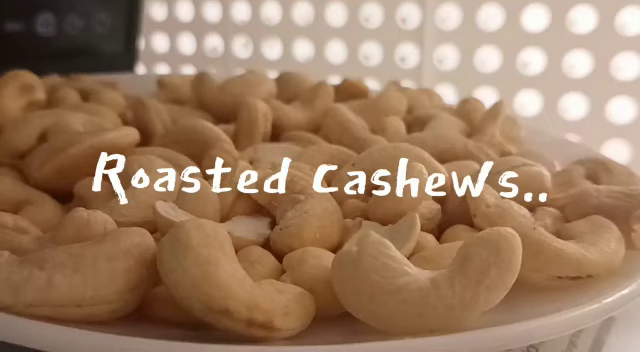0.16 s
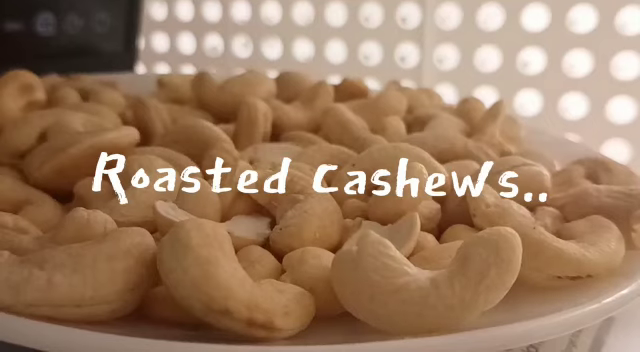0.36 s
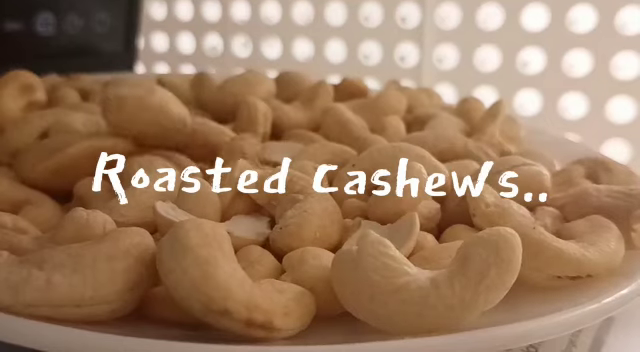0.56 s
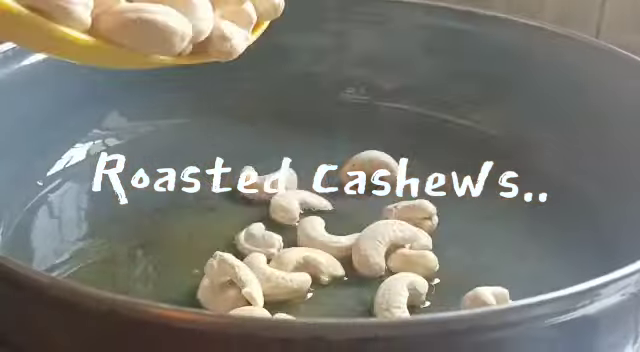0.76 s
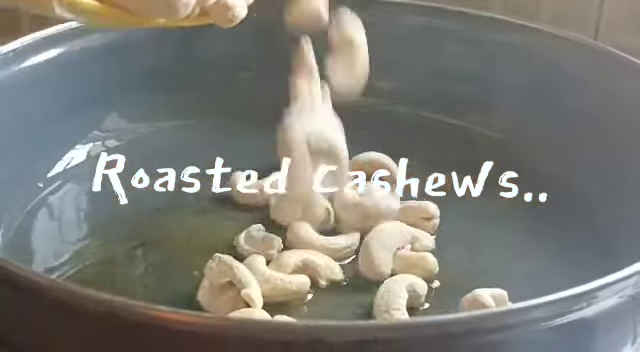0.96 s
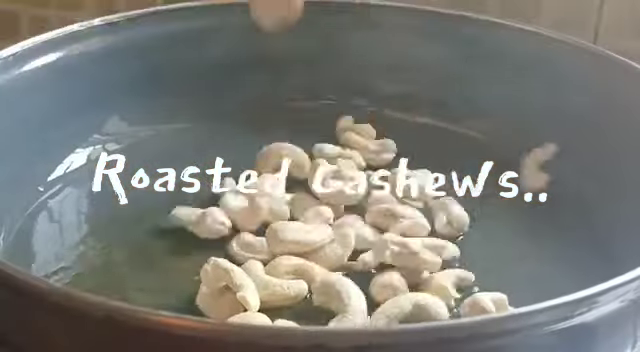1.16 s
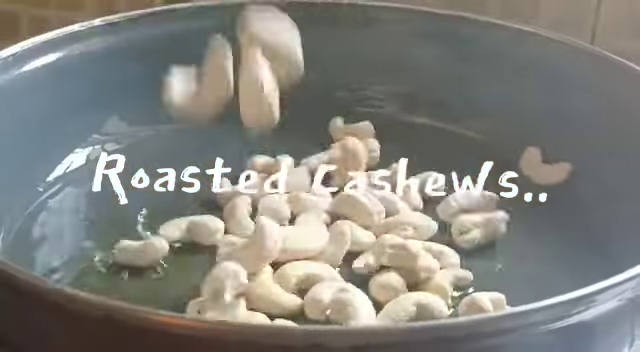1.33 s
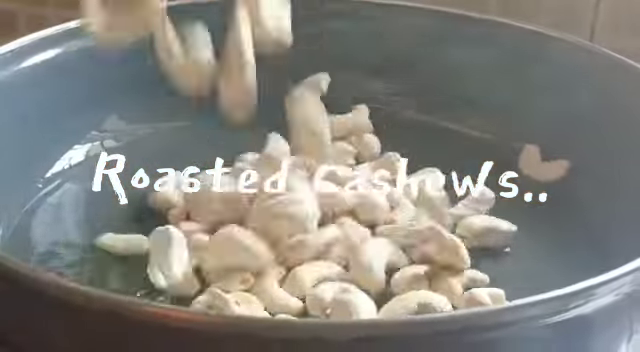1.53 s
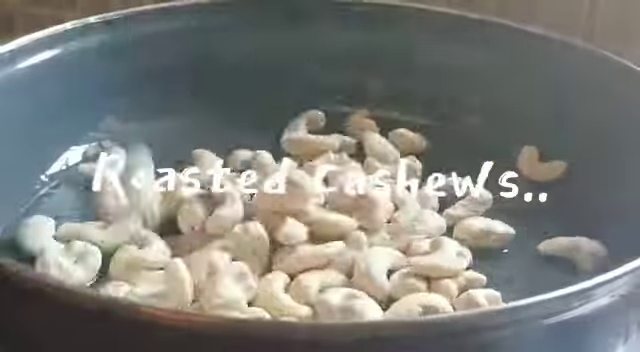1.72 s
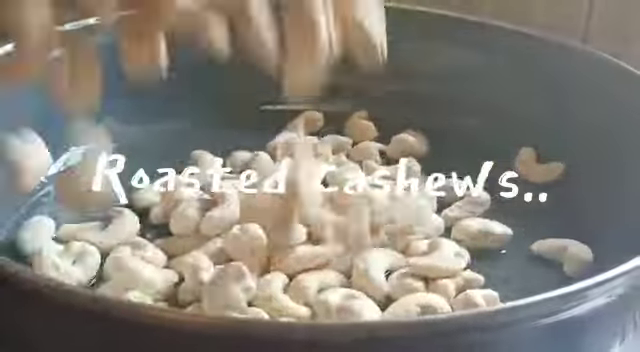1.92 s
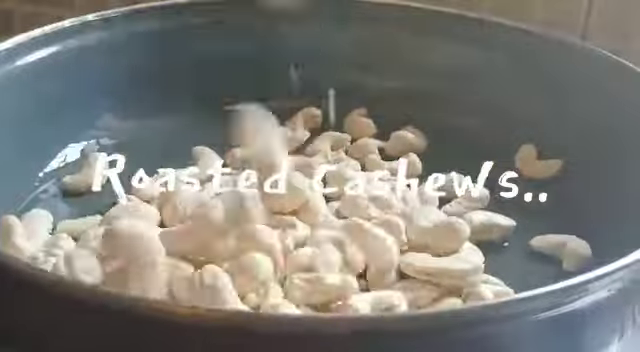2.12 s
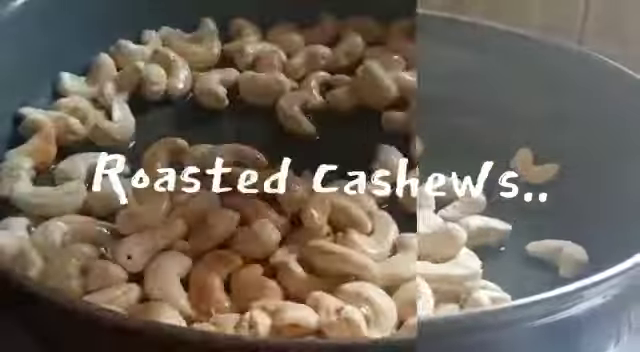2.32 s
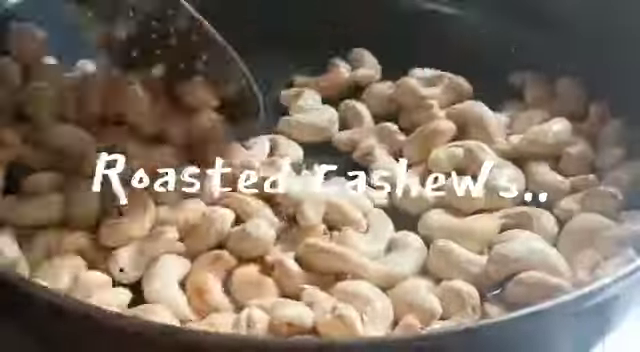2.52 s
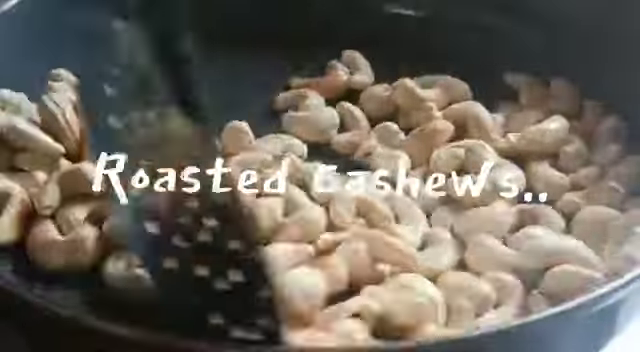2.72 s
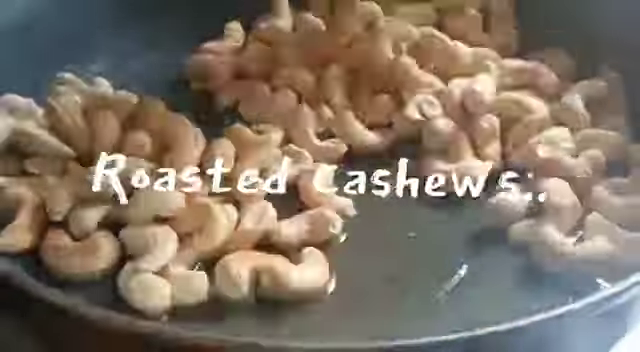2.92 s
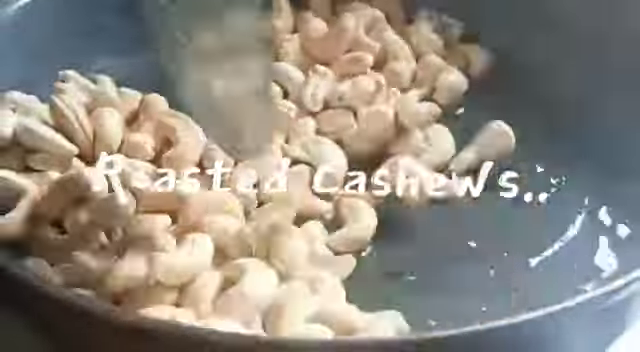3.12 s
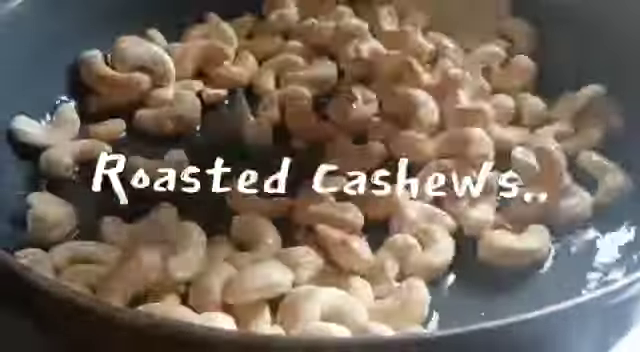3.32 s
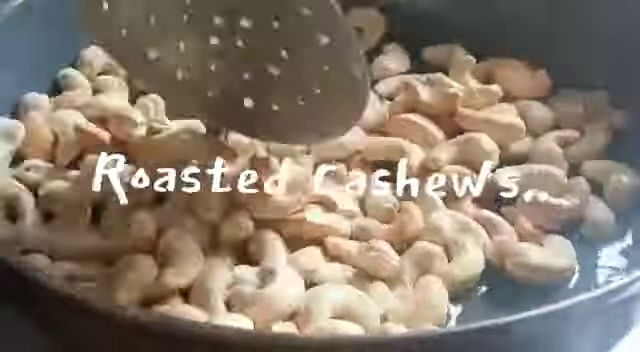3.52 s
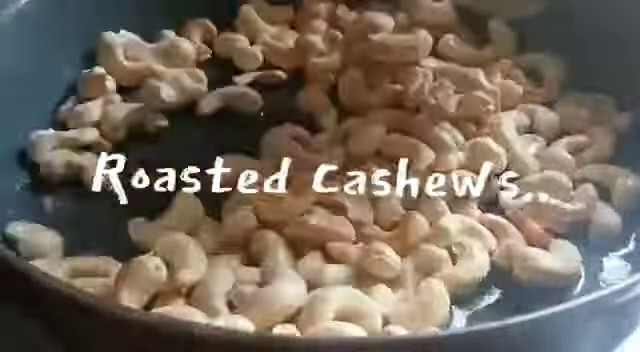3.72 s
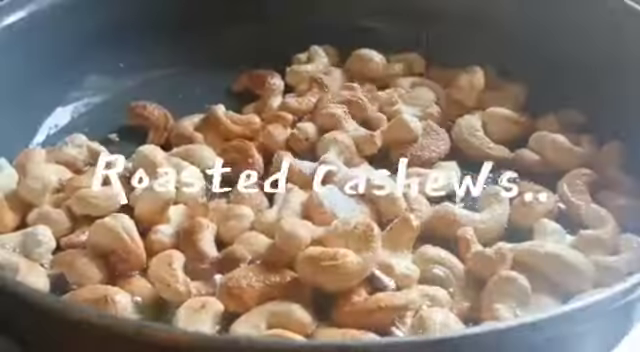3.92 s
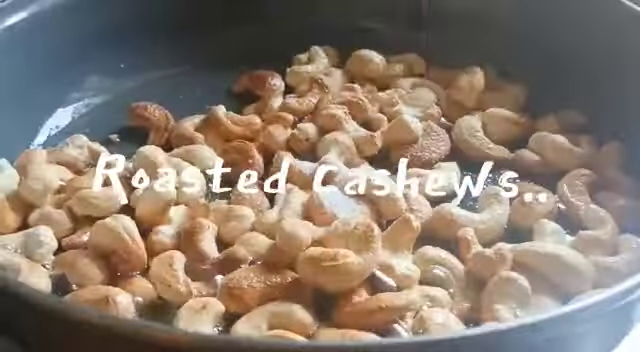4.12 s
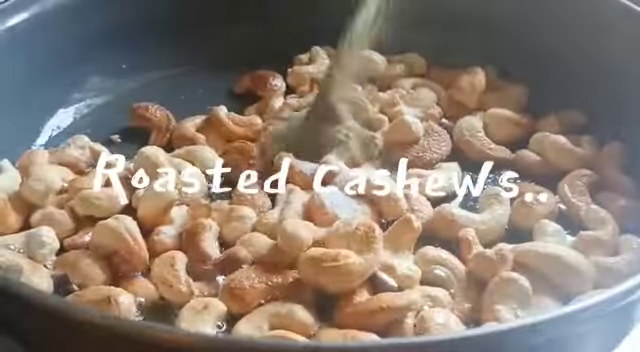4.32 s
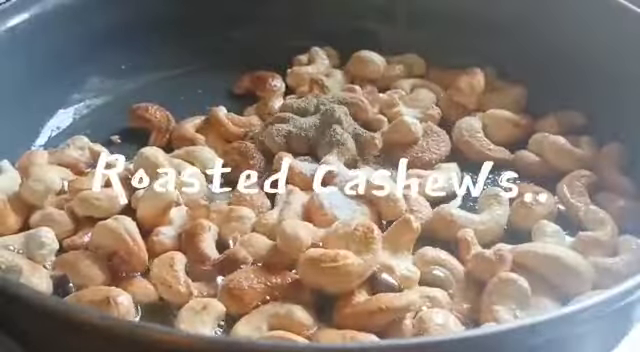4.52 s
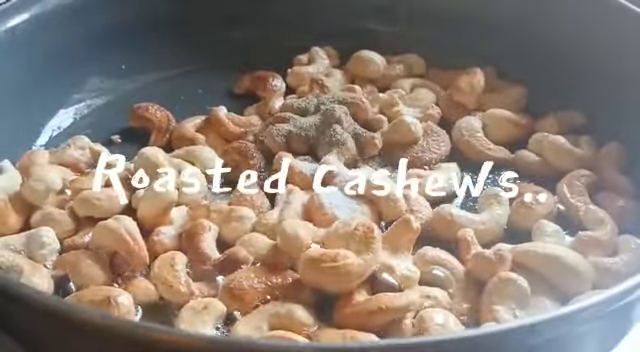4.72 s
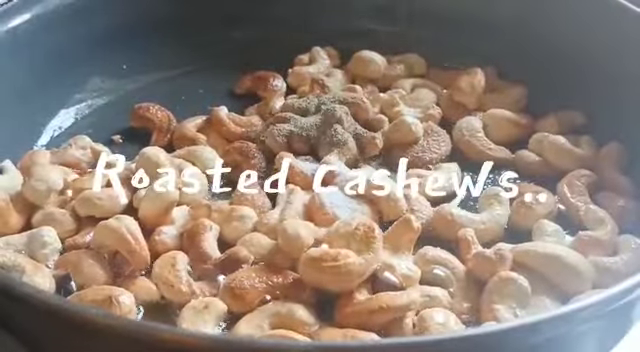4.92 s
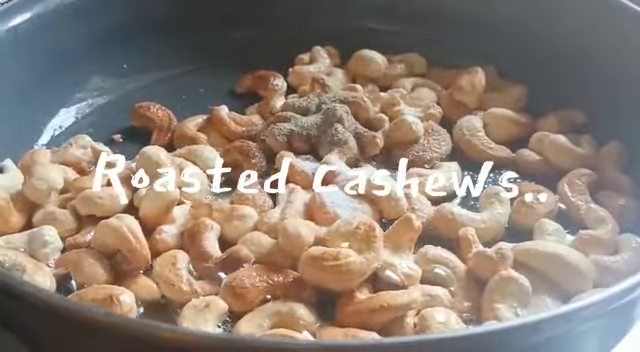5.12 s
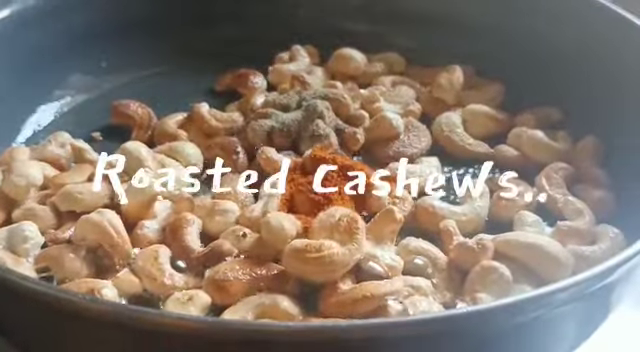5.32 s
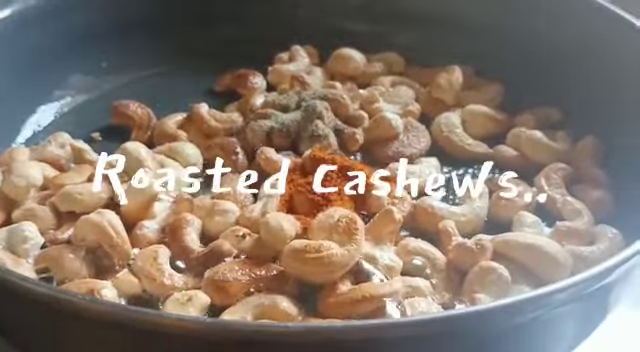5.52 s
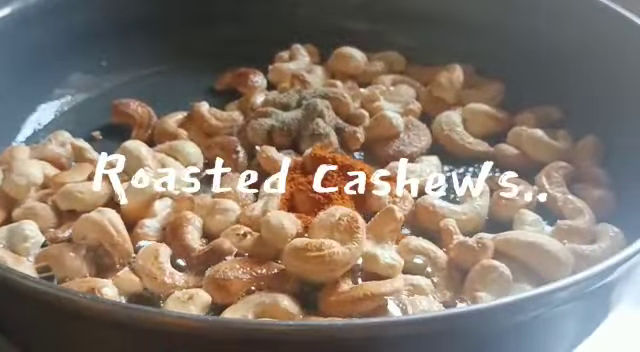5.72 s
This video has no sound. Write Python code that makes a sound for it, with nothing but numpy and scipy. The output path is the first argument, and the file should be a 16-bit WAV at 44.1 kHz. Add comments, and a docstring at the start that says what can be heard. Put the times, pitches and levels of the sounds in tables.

```python
"""Cashews poured into an oiled frying pan, ringing the bare metal and then thudding on the heap;
a spatula knocks and scrapes among them. This is the middle of three short scenes in a kitchen, with
silence between: before it a nut bounces on a china plate, after it a spoon taps over sizzling oil and
the stove's hum. Blows are noise cracks with ringing modes, rubbing is a crowd of small blows, oil is
random pops over hiss, and the room is filtered noise, all shared between a left and a right microphone."""
import sys
import numpy as np
from scipy import signal
from scipy.fft import rfft, irfft, next_fast_len
from scipy.io import wavfile
from scipy.ndimage import uniform_filter1d

SR = 44100
rng = np.random.default_rng(int(sys.argv[2]) if len(sys.argv) > 2 else 0)


def write(x):
    x = np.atleast_2d(x).T
    wavfile.write(sys.argv[1], SR, np.round(np.clip(x, -1, 1) * 32767).astype(np.int16))


N = 258426
TIME = np.arange(N) / SR
RING_TIME = np.arange(10000) / SR

# resonances of the frying pan: (frequency [Hz], relative level [dB], decay by 60 dB [s])
PAN_MODES = [(648.2, 1, 0.17), (793, -1.5, .26), (870, -5, 0.5), (966.4, 2, 0.11), (1040, 5, 0.18),
             (1245, -0.5, 0.33), (1356, -1, 0.2), (1595, 8, 0.08), (1440, -24.5, 0.12), (1972, -3, 0.23),
             (2090, -6.5, 0.14), (2426, -9.5, 0.23), (2934, -2.5, 0.26), (3690, -18, 0.98),
             (3930, -12, 0.99), (4140, -6, 0.031)]


def pour():
    """Nuts fall on the bare pan, which rings; once it is covered they land with a duller thud."""
    # single nuts landing: (time [s], relative clack level [dB], hardness as clack over body [dB])
    drops = [(0.914, -36.5, 5), (0.984, -28, -8), (1.018, -18.5, 5.5), (1.051, -30, -11.5),
             (1.08, -29.5, -5), (1.113, -36.5, 12), (1.131, -30, -10.5), (1.162, -29.5, -6.5),
             (1.229, -28.5, 5), (1.271, -31.5, 11.5), (1.293, -23.5, 7.5), (1.312, -29, -11),
             (1.341, -35.5, -9.5), (1.376, -38.5, -11), (1.423, -25.5, -4.5), (1.47, -29.5, -5.5),
             (1.509, -24, 2.5), (1.555, -29, -3.5), (1.571, -23.5, -3.5), (1.652, -22.5, 10),
             (1.675, -28.5, -2.5), (1.734, -24, 8), (1.78, -38, -7.5), (1.814, -40.5, -15.5),
             (1.842, -36, -4), (1.959, -26.5, -0.5), (2.007, -23, 0), (2.04, -23, -4.5), (2.071, -18, 8),
             (2.082, -26, 10), (2.109, -24.5, 8), (2.123, -27, -4.5), (2.162, -34.5, 3), (2.203, -39, -5.5),
             (2.26, -37, -6), (2.334, -38, 5.5)]
    # handfuls tumbling in: (start [s], length [s], relative level [dB])
    handfuls = [(0.914, 0.083, -48), (0.987, 0.0074, -31.5), (1.022, 0.2, -23.5), (1.321, 0.02, -26),
                (1.428, 0.1, -25.5), (1.564, 0.16, -22.5), (1.961, 0.11, -27.5)]
    # nuts sliding just before they fall: (start [s], length [s], relative level [dB])
    slides = [(0.876, 0.09, -62.5), (1.899, 0.05, -43)]
    # crack of a nut on bare pan: (frequency [Hz], relative level [dB])
    nut_on_pan = [(59, -70.5), (100, -58.5), (197, -23.5), (471, -16), (768, -1.5), (1010, -8),
                  (1130, -15.5), (1280, 1.5), (1450, -9.5), (2040, -12.5), (2800, -13), (7140, -26),
                  (9210, -31), (12400, -47), (16000, -40.5)]
    # crack of a nut on other nuts: (frequency [Hz], relative level [dB])
    nut_on_nut = [(60, -61.5), (120, -30), (200, -13), (300, -14.5), (458, -9.5), (750, -6.5), (1010, -8.5),
                  (1170, -10.5), (1400, -7), (1850, -14), (2840, -11), (3800, -4.5), (4860, -12),
                  (8920, -18), (12400, -32.5), (16000, -32.5)]
    # left over right microphone: (frequency [Hz], level difference [dB])
    left_over_right = [(60, 19), (110, -0.5), (200, 0), (380, 5.5), (700, 7.5), (1290, 13.5), (2380, 5),
                       (4400, 3), (8120, -24.5), (15000, -18.5)]
    covered_s = 1.95  # from here on the nuts land on nuts
    depth_db, wash_t60 = 4, .1

    def landing():
        """One nut hits bare metal, with a long crack."""
        blow = strike(nut_on_pan, PAN_MODES, crack_t60=0.022, ring_db=-5, room_db=-10.5, room_t60=0.16)
        return own_pitch(blow, depth_db)

    def bounce():
        """One nut of a handful hits bare metal, with a short crack and a strong ring."""
        blow = strike(nut_on_pan, PAN_MODES, crack_t60=0.0061, ring_db=-1, room_db=-1, room_t60=wash_t60)
        return own_pitch(blow, depth_db)

    def thud():
        """One nut hits the heap, with a weaker ring."""
        blow = strike(nut_on_nut, PAN_MODES, crack_t60=0.028, ring_db=-6.5, room_db=-0.5, room_t60=wash_t60)
        return own_pitch(blow, depth_db)

    early_drops = [row for row in drops if row[0] < covered_s]
    late_drops = [row for row in drops if row[0] >= covered_s]
    on_pan = impacts(early_drops, landing, tick_db=-17.5, tick_growth=0.74)
    on_heap = impacts(late_drops, thud, tick_db=-10.5, tick_growth=0.12)

    # level offsets of body, clack and tick
    pan_db, heap_db, slide_db = np.array([[-1, -11, -28], [-1, -5, -18], [-1, 0, -23]])
    early_moves = [(s, length, db + pan_db) for s, length, db in handfuls if s < covered_s]
    late_moves = [(s, length, db + heap_db) for s, length, db in handfuls if s >= covered_s]
    slide_moves = [(s, length, db + slide_db) for s, length, db in slides]
    tumble = rattle(early_moves, bounce, per_s=420, spread_db=4, attack_s=0.0048,
                    fades_db_per_s=[125, 135, 160], count=8)
    settle = rattle(late_moves, thud, per_s=460, spread_db=-0.5, attack_s=0.024,
                    fades_db_per_s=[125, 120, 130], count=6)
    slide = rattle(slide_moves, thud, per_s=900, spread_db=-1.0, attack_s=0.05,
                   fades_db_per_s=[400, 400, 400], count=3)
    crowd = patchy(slide + tumble + settle, depth_db=2.5)
    return place(amp(-4.5) * (on_pan + on_heap) + crowd, left_over_right)


def stir():
    """The spatula knocks and scrapes; the heap of nuts damps the pan, so its ring is set low."""
    # spatula blows: (time [s], relative clack level [dB], hardness as clack over body [dB])
    knocks = [(2.432, -32.5, 16), (2.533, -33, 12.5), (2.684, -20.5, 17.5), (2.71, -25, 29.5),
              (2.826, -21.5, -3), (3.012, -25.5, 19.5), (3.085, -20, 2), (3.653, -32, 18),
              (3.688, -53.5, -15), (3.9, -46, 2)]
    # pushes through the nuts: (start [s], length [s], relative clack level [dB], hardness [dB])
    strokes = [(2.462, 0.081, -40, 5), (2.688, 0.039, -40.5, -4), (2.736, 0.091, -44.5, 9.5),
               (2.827, 0.028, -38, 1), (3.014, 0.028, -41, 3), (3.063, 0.027, -49.5, 12.5),
               (3.102, 0.016, -39, 0.5), (3.255, 0.021, -51.5, -14.5), (3.299, 0.021, -61, -13),
               (3.558, 0.012, -69, -13.5), (3.656, 0.016, -39, 1), (3.67, 0.032, -49, -14)]
    # crack of the spatula on the pan: (frequency [Hz], relative level [dB])
    spatula_crack = [(60, -33), (140, -22.5), (210, 2), (320, -1), (480, -6), (850, -4.5), (1350, -1.5),
                     (1900, -11), (3000, -14.5), (5500, -8.5), (9500, -9), (13000, -19), (15000, -6.5),
                     (16500, -21.5)]
    # left over right microphone: (frequency [Hz], level difference [dB])
    left_over_right = [(60, 10.5), (110, -15.5), (200, 2.5), (380, 4), (700, 6.5), (1290, 17), (2380, 7.5),
                       (4400, 6), (8120, -2.5), (15000, -1.5)]

    def knock():
        """A blow of the spatula."""
        return strike(spatula_crack, PAN_MODES, crack_t60=0.041, ring_db=-26, room_db=-5.0, room_t60=0.11)

    def slip():
        """A small contact within a scrape."""
        return strike(spatula_crack, PAN_MODES, crack_t60=0.011, ring_db=-8.0, room_db=-1.5, room_t60=0.059)

    pushes = [(s, length, band_levels(db, hardness_db, tick_db=-7.5, tick_growth=1.0))
              for s, length, db, hardness_db in strokes]
    scrape = rattle(pushes, slip, per_s=380, spread_db=2, attack_s=0.0087, fades_db_per_s=[600, 750, 750])
    scrape = patchy(scrape, depth_db=3.5)
    blows = impacts(knocks, knock, tick_db=-8, tick_growth=0.47)
    return place(amp(-7) * blows + amp(1.5) * scrape, left_over_right)


def plate():
    """A nut bounces on china: each touch is a short crack that sets the plate's modes ringing."""
    # bounces: (time [s], relative peak level [dB])
    bounces = [(0.5555, -3), (0.5675, -40.5), (0.5795, -15.5), (0.5945, -12.5), (0.698, -36.5)]
    # china resonances: (frequency [Hz], relative level [dB], decay by 60 dB [s])
    china_modes = [(1390, -20, 0.19), (2470, -32.5, .35), (2700, -9, .12), (2815, -0.5, 0.31),
                   (2870, -5, 0.49), (4230, -4, 0.23), (4300, -9, .2), (5170, -24.5, 0.23),
                   (7200, -10.5, 0.18)]
    # crack of nut on china: (frequency [Hz], relative level [dB])
    china_crack = [(260, -82.5), (450, -42), (631, -21.5), (965, -18.5), (1120, -20), (2360, -14.5),
                   (2730, -1.5), (3120, -19.5), (4250, -10.5), (4990, -26.5), (7420, -37.5), (13300, -67),
                   (15000, -65)]
    # left over right microphone: (frequency [Hz], level difference [dB])
    left_over_right = [(60, 4), (240, 8.5), (950, 30.5), (3770, 22), (15000, 17.5)]

    def blow():
        """One touch of the nut."""
        return strike(china_crack, china_modes, crack_t60=0.0085, ring_db=-13, room_db=-11, room_t60=0.3)

    return amp(-3.5) * place(clinks(bounces, blow), left_over_right)


def spoon():
    """Two quick, bouncing taps of a spoon: short cracks with a brief ring of its modes."""
    # taps: (time [s], relative peak level [dB])
    taps = [(4.622, -31), (4.628, -24), (4.805, -26), (4.811, -26.5), (4.832, -43)]
    # spoon resonances: (frequency [Hz], relative level [dB], decay by 60 dB [s])
    spoon_modes = [(3300, -10, 0.4), (3380, 1, 0.14), (3780, 4.5, 0.047), (3500, -6, 0.28),
                   (4040, -18, 0.14), (4830, -9, 0.11)]
    # crack of the tap: (frequency [Hz], relative level [dB])
    tap_crack = [(500, -33), (1400, -33), (2200, -11), (3500, 14.5), (5500, -1), (10000, -9), (16000, -44)]

    def blow():
        """One touch of the spoon."""
        tap = strike(tap_crack, spoon_modes, crack_t60=0.0091, ring_db=-3, room_db=1.5, room_t60=0.19)
        return own_pitch(tap, depth_db=2)

    return amp(-3.0) * clinks(taps, blow)


def notes_and_swells():
    """Hollow pan notes, noise swells and short ringing tones: narrow noise, a little to the left."""
    # short hollow notes as the spatula slides:
    # (middle [s], relative level [dB], frequency [Hz], bandwidth [Hz], length [s])
    pan_notes = [(2.461, -36, 836, 34, 0.029), (2.488, -39.5, 885, 25, 0.052),
                 (2.74, -38.5, 824, 27, 0.056), (3.252, -31.5, 1146, 180, 0.016),
                 (3.28, -38, 860, 100, 0.029), (3.575, -42, 910, 294, 0.04), (3.701, -35.5, 812, 70, 0.04),
                 (3.768, -54.5, 675, 150, 0.044), (3.876, -39, 824, 66, 0.045)]
    # soft noise swells, from low murmurs to high swishes:
    # (middle [s], relative level [dB], frequency [Hz], length [s])
    noise_swells = [(0.365, -72.5, 3900, 0.092), (0.517, -67.5, 1650, 0.2), (2.387, -61, 1160, 0.041),
                    (2.765, -52.5, 230, 0.15), (2.779, -38, 5560, 0.12), (3.415, -53, 6020, 0.34),
                    (3.664, -46, 5200, 0.044), (3.698, -44, 344, 0.065), (3.842, -55, 8440, 0.18),
                    (4.935, -61.5, 1750, 0.037), (5.325, -63.5, 1590, 0.07)]
    # short narrow ringing tones, some from the struck pan and the tapping spoon:
    # (middle [s], relative level [dB], frequency [Hz], length [s])
    ringing_tones = [(0.474, -59.5, 1340, 0.11), (0.481, -62, 990, 0.19), (0.741, -60, 416, 0.17),
                     (0.929, -52.5, 1044, 0.11), (3.688, -49.5, 3860, 0.1), (4.462, -64.5, 345, 0.22),
                     (4.625, -60.5, 1410, 0.074), (4.82, -50.5, 717, 0.053)]
    note_db, noise_db, tone_db = np.array([[4, -5], [4, -4], [4, -5]])  # left, right
    noise_width_hz = 236  # at 1 kHz; higher swells are wider
    tone_width = 0.06  # share of the pitch
    out = np.zeros((2, N))
    for s, db, hz, width_hz, length in pan_notes:
        add(out, s - length / 2, swell(db + note_db, hz, width_hz, length))
    for s, db, hz, length in noise_swells:
        width_hz = noise_width_hz * np.sqrt(hz / 1000)
        add(out, s - length / 2, swell(db + noise_db, hz, width_hz, length))
    for s, db, hz, length in ringing_tones:
        add(out, s - length / 2, swell(db + tone_db, hz, tone_width * hz, length))
    return out


def stirring_oil():
    """Oil under the spatula: sparse bubble pops in hiss, growing, stronger on the right."""
    # colour of the oil: (frequency [Hz], relative level [dB])
    oil_colour = [(590, -21), (1000, -13.5), (1140, -21), (1460, -9), (1620, -23), (2530, -15.5),
                  (4590, -15), (5290, -14), (6090, -9), (6610, -8), (8760, -3), (12700, -31),
                  (15200, -18.5), (15900, -18.5), (16500, -42)]
    # course of the oil: (time [s], relative level [dB])
    oil_course = [(0.83, -84.5), (2.25, -71), (2.6, -56.5), (3.92, -54.5)]
    oil = sizzle(oil_colour, per_s=480, spread_db=0.0, hiss_db=-1.5, restless_db=-2.7)
    return level(oil_course) * oil * amp([[0], [3]])


def resting_oil():
    """Oil left to sizzle: dense bubble pops of uneven strength in a strong hiss."""
    # colour of the oil: (frequency [Hz], relative level [dB])
    oil_colour = [(590, -3.5), (1000, -1), (1370, -1.5), (2070, -3), (2220, -0.5), (2710, -3.5),
                  (3310, -6.5), (3760, 1), (4990, -3), (5810, 3), (7700, 1.5), (13200, -19), (15200, -2),
                  (15900, -8), (16500, -34)]
    # course of the oil: (time [s], relative level [dB])
    oil_course = [(4.02, -65), (4.166, -58.5), (5.348, -58), (5.37, -63), (5.86, -64.5)]
    oil = sizzle(oil_colour, per_s=3300, spread_db=5.5, hiss_db=5.5, restless_db=3.0)
    return amp(2.5) * level(oil_course) * oil


def sizzle(spectrum, per_s, spread_db, hiss_db, restless_db):
    """Tiny bubbles burst in the oil over a fine, restless hiss."""
    bursts = rng.random((2, N)) < per_s / SR
    strengths = amp(spread_db * np.minimum(rng.exponential(1, (2, N)), 5))
    pops = bursts * strengths * rng.choice([-1, 1], (2, N))
    oil = evened(pops) + amp(hiss_db) * rng.standard_normal((2, N))
    oil = oil + 0.099 * oil[::-1]  # a little of each side reaches the other microphone
    return evened(patchy(colour(oil, spectrum), restless_db))


def stove_hum():
    """The stove's low hum: a narrow band of noise whose strength and phase wander."""
    # course of the hum: (time [s], level [dB])
    hum_course = [(2.3, -79.5), (3.5, -75.5), (4.6, -72), (5.2, -62.5), (5.86, -69.5)]
    return level(hum_course) * wavering(77, 11.0, count=N)


def air(spectrum):
    """Steady room noise of rms 1, partly alike at both microphones."""
    common = rng.standard_normal(N)
    apart = rng.standard_normal((2, N))
    return evened(colour(common + 1.3 * apart, spectrum, size=8192))


def strike(spectrum, modes, crack_t60, ring_db, room_db, room_t60):
    """One blow: a short crack, its wash in the kitchen, and modes weighted by the spot that is hit."""
    hz, db, t60 = np.transpose(modes).astype(np.float32)[:, :, None]
    t = RING_TIME.astype(np.float32)
    decay = 10 ** (np.maximum(db - 60 * t / t60, -200) / 20)
    waves = np.sin(2 * np.pi * hz * t) * decay
    # each microphone hears a slightly different balance of modes
    weights = rng.choice([-1, 1], len(modes)) * (1 + .35 * rng.standard_normal((2, len(modes))))
    ring = np.einsum("em,mt->et", weights, waves)
    crack = colour(dying(crack_t60) + amp(room_db) * dying(room_t60), spectrum)
    return crack + amp(ring_db) * evened(ring) / np.sqrt(len(t))


def dying(t60, alike_hz=900):
    """Dense reflections dying by 60 dB in t60; bass is alike at both microphones, treble is not."""
    common, apart = rng.choice([-1., 1.], (2, len(RING_TIME)))
    apart = signal.sosfilt(signal.butter(2, alike_hz, "high", fs=SR, output="sos"), apart)
    x = np.array([common + .8 * apart, common - .8 * apart]) * amp(-60 * RING_TIME / t60)
    return x / np.linalg.norm(x[0])


def own_pitch(blow, depth_db, count=45):
    """Every nut and contact point favours its own resonances: a random bumpy spectrum."""
    hz = np.geomspace(500, 16000, count)
    bumps_db = depth_db * np.clip(rng.standard_normal(count), -2, 2)
    return colour(blow, np.c_[hz, bumps_db], size=1024)


def clinks(rows, blow):
    """Light blows on one object, each scaled to its peak."""
    out = np.zeros((2, N))
    for s, db in rows:
        sound = blow()
        add(out, s, amp(db) * sound / abs(sound).max())
    return out


def impacts(rows, blow, tick_db, tick_growth, contact_s=.0025, count=900):
    """Blows of differing hardness, sounding just after first touch."""
    out = np.zeros((2, N))
    for s, db, hardness_db in rows:
        levels = band_levels(db, hardness_db, tick_db, tick_growth)
        # each band is levelled over its first count samples
        parts = [amp(part_db) * band / band[:, :count].std() for part_db, band in zip(levels, bands(blow()))]
        add(out, s + contact_s, sum(parts))
    return out


def rattle(moves, blow, per_s, spread_db, attack_s, fades_db_per_s, count=6):
    """Many small random contacts at a few spots; each move (start, length, band levels) swells and fades."""
    longest_s = 1.45
    start = moves[0][0]
    t = start + np.arange(round(longest_s * SR)) / SR
    # each spot has its own sound and its own sparse train of contacts
    crowd = np.zeros((2, len(t)))
    for _ in range(count):
        contacts = rng.random(len(t)) < per_s / count / SR
        clicks = contacts * amp(spread_db * np.minimum(rng.exponential(1, len(t)), 2))
        crowd += signal.oaconvolve(clicks[None], blow(), axes=1)[:, :len(t)]
    out = np.zeros((2, N))
    for k, band in enumerate(bands(crowd)):
        forces = []
        for s, length, levels in moves:
            rise = np.clip((t - s) / attack_s, 0, 1)
            fade_db = fades_db_per_s[k] * np.maximum(t - s - length, 0)
            forces.append(rise * amp(levels[k] - fade_db))
        running_rms = np.sqrt(uniform_filter1d((band ** 2).mean(0), size=3000) + 1e-12)
        add(out, start, np.max(forces, axis=0) * band / running_rms)
    return out


def bands(x):
    """Splits a sound into body, clack and tick."""
    # borders between the bands: (frequency [Hz])
    edges_hz = [175, 2200, 7500, 16000]
    filters = [signal.butter(3, edges, "band", fs=SR, output="sos") for edges in zip(edges_hz, edges_hz[1:])]
    return [signal.sosfilt(sos, x) for sos in filters]


def band_levels(db, hardness_db, tick_db, tick_growth):
    """Levels of body, clack and tick: a harder contact has less body and more tick."""
    return [db - hardness_db, db, db + tick_db + tick_growth * hardness_db]


def patchy(x, depth_db):
    """Resonances come and go: random smooth patches over time and frequency."""
    z = signal.stft(x, nperseg=512)[2]
    patches = uniform_filter1d(rng.standard_normal(z.shape[1:]), size=4, axis=0)
    patches = evened(uniform_filter1d(patches, size=6, axis=1))
    return signal.istft(z * amp(depth_db * np.clip(patches, -2, 2)), nperseg=512)[1][:, :N]


def swell(out_db, hz, width_hz, length):
    """A narrow band of noise that swells and fades, at the given left and right levels."""
    count = round(length * SR)
    return amp(out_db)[:, None] * wavering(hz, width_hz, count) * np.hanning(count)


def wavering(hz, width_hz, count):
    """A tone whose strength and phase wander: random phases under a bell-shaped spectrum."""
    size = next_fast_len(count + 8192)
    offset = (np.fft.rfftfreq(size, 1 / SR) - hz) / width_hz
    phases = 2j * np.pi * rng.random(len(offset))
    return evened(irfft(np.exp(-np.minimum(offset ** 2, 50) + phases), size)[:count])


def place(x, left_over_right):
    """Shares each frequency's power between the microphones; the left one hears it a little later."""
    lag_s = 40 / SR
    size = next_fast_len(N + 100)
    hz = np.fft.rfftfreq(size, 1 / SR)
    ratio = amp(read(left_over_right, hz))
    gains = np.array([ratio * np.exp(-2j * np.pi * hz * lag_s), np.ones_like(ratio)])
    return irfft(rfft(x, size) * gains * np.sqrt(2 / (1 + ratio ** 2)), size)[:, :N]


def colour(x, spectrum, size=2048):
    """Causal minimum-phase filter with the given spectrum, its taps scaled to energy 1."""
    log_gain = np.log(amp(read(spectrum, abs(np.fft.fftfreq(size, 1 / SR)))))
    taps = np.fft.ifft(np.exp(np.conj(signal.hilbert(log_gain)))).real
    return signal.fftconvolve(x, taps[None] / np.linalg.norm(taps), axes=1)[:, :x.shape[1]]


def read(points, hz):
    """Reads a spectrum on a log-frequency axis."""
    f, value = np.transpose(points)
    return np.interp(np.log(hz + 1), np.log(f + 1), value)


def level(rows):
    """A gain curve from rows of (time [s], level [dB])."""
    return amp(np.interp(TIME, *np.transpose(rows)))


def amp(db):
    """Decibels to gain."""
    return 10 ** (np.asarray(db) / 20)


def evened(x):
    """Scales to rms 1."""
    return x / np.sqrt(np.mean(x ** 2) + 1e-20)


def add(mix, s, sound):
    """Adds a stereo sound at time s."""
    part = mix[:, round(s * SR):][:, :sound.shape[1]]
    part += sound[:, :part.shape[1]]


def scene():
    """Plate, pan and resting pan, one after the other, with fades to silence between."""
    # room noise at the plate: (frequency [Hz], relative level [dB])
    plate_air = [(15, -74.5), (25, -26.5), (152, -5), (276, -11), (314, -19.5), (541, -14.5), (631, -19.5),
                 (776, -16), (1200, -19), (12000, -50.5), (15600, -93), (22000, -120)]
    # room noise at the pan: (frequency [Hz], relative level [dB])
    pan_air = [(15, -23), (25, -9.5), (70, -7.5), (195, -2), (261, -8.5), (350, -5), (515, -11),
               (1410, -12.5), (2000, -12), (2600, -40), (4400, -120)]
    # room noise at the resting pan: (frequency [Hz], relative level [dB])
    rest_air = [(15, -77), (25, -52), (76, -6.5), (134, -18.5), (178, -2), (294, -23), (417, -15.5),
                (556, -49), (787, -12.5), (1090, -43), (1380, -18.5), (2230, -30), (2500, -73), (3250, -73),
                (5500, -120)]
    # left over right microphone at the resting pan: (frequency [Hz], level difference [dB])
    rest_left_over_right = [(60, 9), (150, 0.5), (380, 3), (950, 9), (2380, 4.5), (5980, -6), (15000, -4)]
    # fades in and out of the scenes: (time [s], gain [0 to 1])
    scene_fades = [(0, 1), (0.762, 1), (0.77, 0), (0.82, 0), (0.92, 1), (3.908, 1), (3.916, 0), (3.98, 0),
                   (4.06, 1), (6, 1)]

    at_pan = pour() + stir() + stirring_oil() + amp(-68.5) * air(pan_air)
    at_plate = plate() + amp(-68) * air(plate_air)
    at_rest = spoon() + place(resting_oil() + amp(-69) * air(rest_air), rest_left_over_right)

    first, last = TIME < .8, TIME > 3.95
    mix = np.where(first, at_plate, np.where(last, at_rest, at_pan))
    mix = mix + notes_and_swells() + stove_hum() * ~first
    return mix * np.interp(TIME, *np.transpose(scene_fades))


def record(dry):
    """Limits the band to below 16.3 kHz with a steep linear-phase low-pass."""
    low_pass = signal.firwin(255, 16300, window=("kaiser", 9), fs=SR)
    return signal.oaconvolve(dry, low_pass[None], "same")


dry = scene()
out = record(dry)
write(out)
```